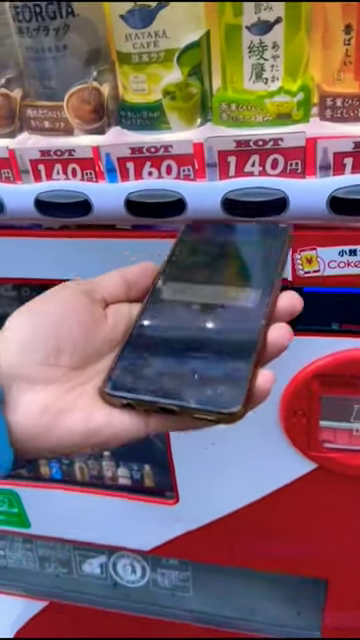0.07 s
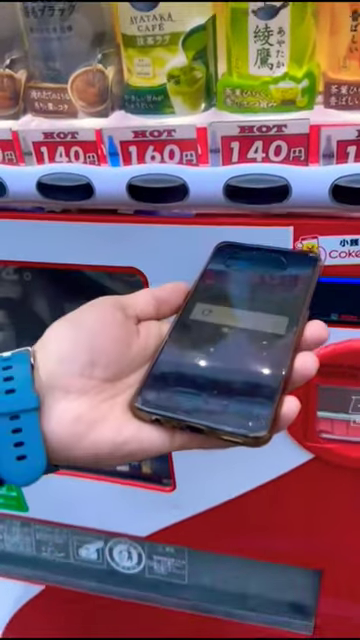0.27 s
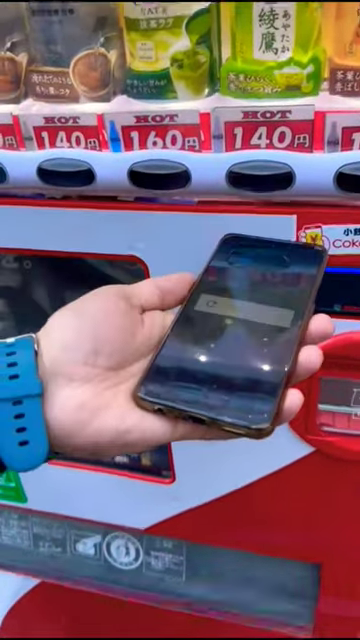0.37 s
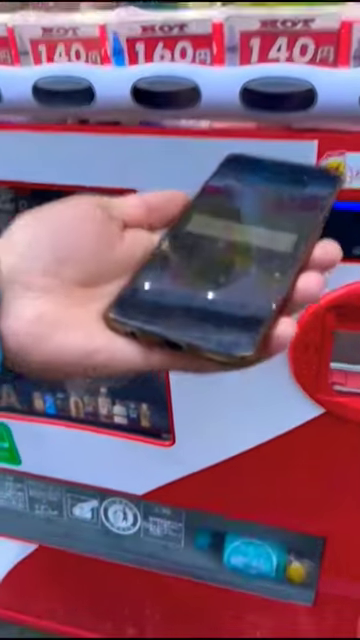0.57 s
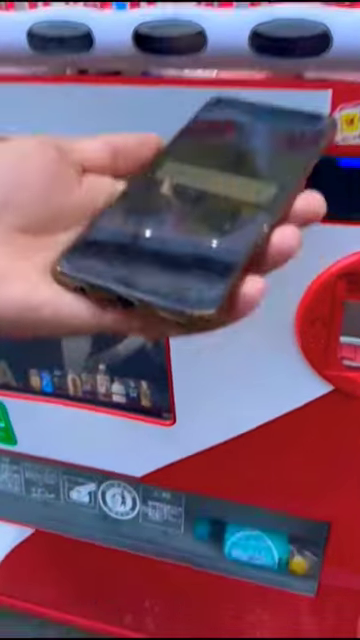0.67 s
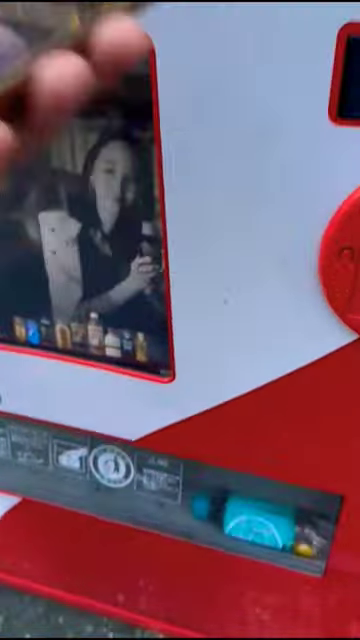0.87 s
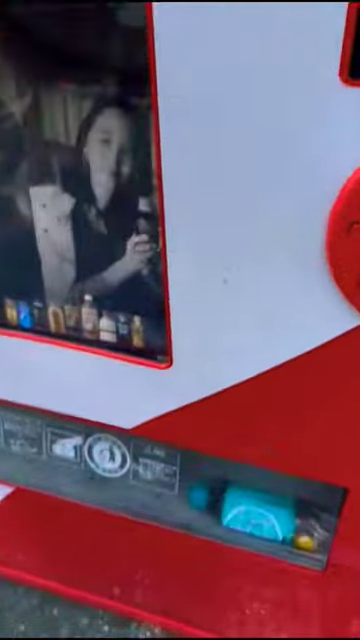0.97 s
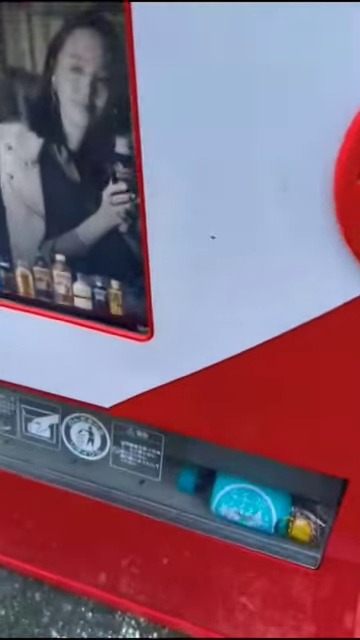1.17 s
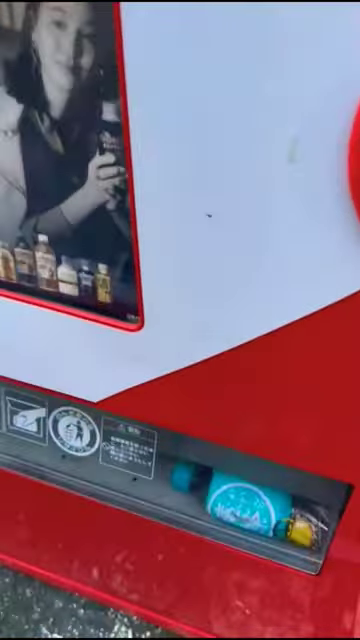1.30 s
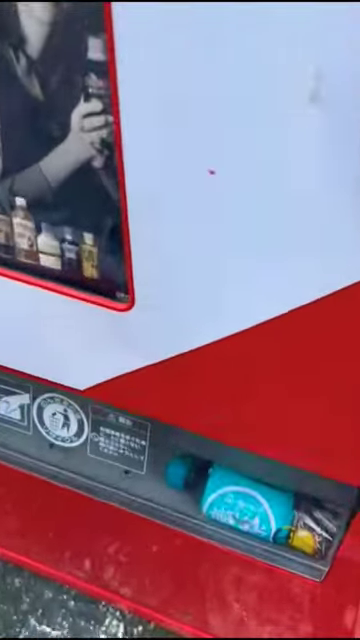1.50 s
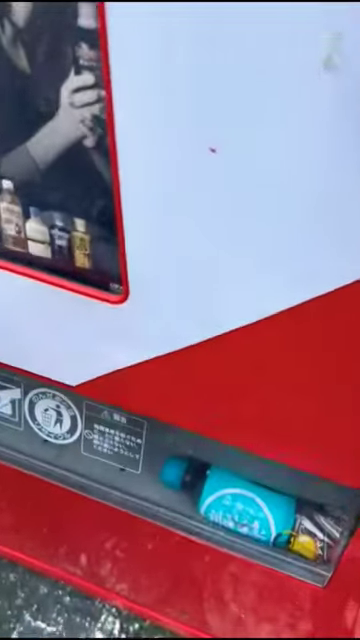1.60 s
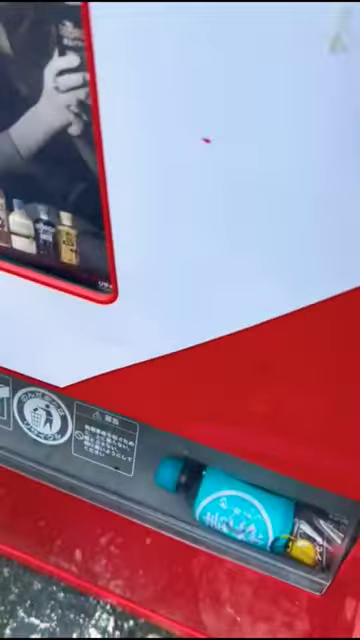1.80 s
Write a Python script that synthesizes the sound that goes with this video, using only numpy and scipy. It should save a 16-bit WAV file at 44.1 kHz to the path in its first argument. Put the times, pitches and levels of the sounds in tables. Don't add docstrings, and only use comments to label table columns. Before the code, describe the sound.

Vending machine drink bottle slides, bangs into the metal chute, then rattles to rest outdoors

```python
import sys
import numpy as np
from scipy import signal
from scipy.fft import rfft, irfft, next_fast_len
from scipy.io import wavfile
from scipy.ndimage import uniform_filter1d

SR = 44100
rng = np.random.default_rng(int(sys.argv[2]) if len(sys.argv) > 2 else 0)


def transcribe(u):
    v = np.clip(np.atleast_2d(u).T, -1, 1)
    q = np.round(v * 32767).astype(np.int16)
    wavfile.write(sys.argv[1], SR, q)


def elevation(decibels):
    levels = np.asarray(decibels, float)
    return 10 ** (levels / 20)


N = 81585
SIZE = next_fast_len(N + SR // 2)
HZ = np.arange(SIZE // 2 + 1) * SR / SIZE + 1e-3
T = np.arange(N) / SR

# [f/Hz, level/dB per Hz]
STREET_COLOUR = [(28, -19), (55, 0), (97, -7), (140, -7.5), (300, -14.5), (800, -17), (1500, -34),
                 (3000, -44), (6500, -51.5), (10500, -55), (12000, -76.5)]
# [f/Hz, level/dB]
STREET_APART = [(40, -8.5), (300, -4), (800, -8), (1600, 0.5), (3000, -0.5), (4000, 1), (4800, -1.5),
                (5500, -50.5), (7900, -44), (9200, -2), (10400, -22)]
STREET_DB, SWELL_DB, FLICKER_DB = -32, 0, 1.5
HUM_HZ, HUM_WIDTH_HZ, HUM_DB = 97.4, 28.8, -31.5

# [t/s, level/dB]
EFFORT = [(0, -48), (.10, -43), (.16, -51.5), (.185, -35), (.28, -35.5), (.31, -54), (.36, -44), (.41, -33),
          (.44, -22.5), (.56, -25), (.61, -30), (.72, -30), (.82, -30), (.86, -46), (1.0, -48.5),
          (1.15, -54.5), (1.3, -57)]
GRAINS_PER_S, GRAIN_SPREAD_DB = 2500, -0.5
RUMBLE_DB, RATTLE_DB, RING_DB = 5.5, 1.5, -30
# [t/s, level/dB, contact/ms]
THUDS = [(.104, -24, 2.3), (0.185, -24, 0.73), (0.202, -17, 2.8), (0.223, -12, 4), (0.254, -23, 2.8),
         (0.286, -21, 2.9), (0.427, -5, 2.45), (0.437, 4.5, 9.9), (0.448, -9, 0.84), (0.456, -18, 0.67),
         (0.459, -6.5, 6.8), (0.513, -30.5, 4.1), (0.544, -32, 1.7), (.559, -20.5, 0.63),
         (.590, -22.5, 0.45), (0.636, -30, 3.3), (.665, -17, 3), (0.672, -19.5, 1.6), (0.71, -24, 0.77),
         (0.718, -15.5, 1.3), (0.764, -25.5, 1.4), (0.82, -23.5, 0.78), (0.83, -19, 1), (0.896, -28.5, 4.6)]
KNOCK_SPREAD_DB, KNOCK_DETUNE = 3, .04
# [t/s, level/dB, decay/ms, tilt/dB per octave]
CRACKS = [(0.174, -32, 110, -6), (0.197, -27, 98, -3.5), (0.252, -32, 250, -6.5), (0.423, -19, 29, -1.5),
          (0.434, -21.5, 17, 8.5), (0.4472, -10.5, 13, 6.5), (0.451, -14.5, 47, 1.5), (0.507, -19, 110, 2),
          (.522, -19.5, 33, 3), (.532, -18.5, 14, 15), (0.539, -8, 17, 1.5), (0.55, -15.5, 11, 2.5),
          (0.555, -17, 41, -2), (0.631, -23, 31, 1.5), (0.642, -27, 52, 4), (0.674, -27.5, 37, 4),
          (0.705, -14.5, 30.6, 2), (0.736, -29, 41, 2), (0.778, -32, 26, 7), (0.794, -26.5, 49, 3.5),
          (0.805, -26.5, 40, 0)]
CRACK_RISE_S, CRACK_GRAIN_DB = 0.0007, 3.3
# [t/s, click level/dB, f/Hz, decay/ms, ring over click/dB]
TICKS = [
    (0.64, -30.5, 3600, 42, -2),
    (0.811, -33, 2240, 35, -5.5),
    (0.939, -39, 5780, 23, -24),
    (0.979, -38, 2320, 12, -15),
    (1.055, -56.5, 5100, 25, 11),
    (1.277, -45.5, 3530, 37, -8),
    (1.436, -46.5, 3440, 25, -7),
    (1.659, -38, 2300, 27, -8),
    (1.687, -46, 2350, 30, -9.5),
    (1.828, -41, 8160, 18, -18),
]
TICK_TILT_DB = 1.5

# [f/Hz, level/dB, t60/s]
CABINET = [(60.8, -15, 0.36), (90.4, -15, 0.22), (138.8, -11, 0.061), (167.5, -9.5, 0.2),
           (213.7, -0.5, 0.16), (252.2, -5, 0.14), (311.6, -5.5, 0.078), (364, 4, 0.05), (473.8, -6, 0.18),
           (592.7, -7.5, 0.17), (628, -14, 0.068), (823, -15.5, 0.1), (942, -8, .1), (1061, -10.5, 0.13)]
# [f/Hz, level/dB, t60/s]
CHUTE = [(1070, -2, .025), (1560, -1, .03), (1700, -3, .03), (2120, -1, .035), (2520, -3, .03),
         (3300, -6, .015), (5900, -4, .015), (6800, -4, .015)]
# [f/Hz, level/dB per Hz]
PLASTIC = [(250, -24.5), (450, 2.5), (1000, -3.5), (2300, -14), (3500, -19.5), (6300, -18), (9300, -24),
           (10300, -21), (11800, -38)]

# [f/Hz, level/dB]
NEAR_APART = [(30, -28), (350, -35.5), (800, -0.5), (1800, -18), (2800, -1), (4000, 1), (4500, -7.5),
              (5400, -39), (7900, -41), (9000, 0.5), (10400, -9.5)]
SCATTER_T60_S = 0.053
# [f/Hz, lag/cycles]
NEAR_LAG = [(0, 0), (520, .15), (720, .27), (1030, .87), (1550, 1)]
# [f/Hz, lag/cycles]
STREET_LAG = [(0, .1), (260, .43), (700, .5), (1300, .56), (1900, .97)]
# [f/Hz, lag/cycles]
PORT_LAG = [(2250, 1.04), (2700, 1.5), (3050, 1.55), (3900, 2), (4150, 2.02), (4600, 2.5), (5000, 2.6),
            (5350, 3), (7800, 3), (10200, 3.5)]
# [f/Hz, left minus right/dB]
NEAR_SHADE = [(170, 0), (350, -2.5), (780, -14), (1150, -7), (1700, 0), (2600, 5), (3450, -2), (4500, 3),
              (5400, 0)]
# [f/Hz, left minus right/dB]
STREET_SHADE = [(170, .5), (550, -3), (1500, -1), (3000, 0)]

LOW_CUT_HZ, TOP_HZ, CEILING = 63, 11800, 1.7
PATCHY_S, PATCHY_LENGTH_S, PATCH_BAND_HZ = 1.52, .2, 90
DROP_DB, DROPS_PER_S = -40, 18
# [from f/Hz, to f/Hz, readiness]
MID_DROPS = [(4600, 4800, 0), (4800, 5000, .9), (5000, 5150, -.1), (4000, 4300, -1.6), (3050, 3350, -1.5),
             (2700, 2850, -1.7), (9300, 9650, -.7), (9650, 10000, .2)]
# [from f/Hz, to f/Hz, readiness]
SIDE_DROPS = [(3850, 4150, .2), (4150, 4400, -.8), (1750, 2000, -.5), (11300, 11700, 0), (11700, 12200, .9)]
# [t/s, length/s, up to f/Hz, level/dB]
TOP_OPEN = [
    (0.168, .04, 10800, -2.5),
    (0.366, .07, 10800, -1),
    (0.436, .03, 11800, -9),
    (0.496, .075, 10940, -5.5),
    (0.604, .03, 11230, -7),
    (.79, 0.027, 10800, -18),
    (.815, .012, 11800, -7),
]
# [t/s, length/s]
SIDE_OPEN = [
    (.395, .07),
    (.603, .025),
    (.693, .052),
    (.812, .025),
]
SIDE_OPEN_DB, SHARED_TOP_HZ = -14, 10160


def level(x, db):
    return x * elevation(db) / np.sqrt(np.mean(x ** 2))


def curve(points):
    hz, db = np.array(points, float).T
    return elevation(np.interp(np.log(HZ), np.log(hz), db))


def shape(x, gain):
    return irfft(rfft(x, SIZE) * gain, SIZE)[..., :N]


def between(lo_hz, hi_hz):
    return (HZ >= lo_hz) & (HZ < hi_hz)


def resonance(hz, width_hz):
    return 1 / (1 + ((HZ - hz) / (width_hz / 2)) ** 2)


def tilt(db_per_octave, floor):
    return elevation(db_per_octave * np.log2(HZ / 3000 + floor))


def ring(x, modes):
    out = 0
    for hz, db, t60 in modes:
        pole = np.exp(2j * np.pi * hz / SR - np.log(1000) / (t60 * SR))
        out = out + elevation(db) * signal.lfilter([1], [1, -pole], x).imag
    return out


def walk(rate):
    k = int(SR / rate)
    held = np.repeat(rng.standard_normal(N // k + 1), k)
    return 1.1 * uniform_filter1d(uniform_filter1d(held, k), k)[:N]


def burst(start, decay_ms, rise_s):
    t = np.maximum(T - start, 0)
    return (1 - np.exp(-t / rise_s)) * elevation(-20 * t / (decay_ms / 1000))


def gate(start, length):
    return np.clip(np.minimum(T - start, start + length - T) / .005, 0, 1)


def traffic():
    out, swell = 0, SWELL_DB * walk(9.4)
    colour, apart = curve(STREET_COLOUR), curve(STREET_APART)
    for hz in 30 * 2 ** np.arange(0, 9, 1 / 3):
        band = colour * np.exp(-.5 * (np.log2(HZ / hz) / .17) ** 2)
        mid, side = rng.standard_normal((2, N))
        mid, side = shape(mid, band), shape(side, band * apart)
        out = out + elevation(swell + FLICKER_DB * walk(8.78)) * np.array([mid + side, mid - side])
    return level(out, STREET_DB)


def compressor():
    mid, side = shape(rng.standard_normal((2, N)), resonance(HUM_HZ, HUM_WIDTH_HZ))
    return level(mid, HUM_DB) + level(side, HUM_DB - 6) * np.array([[1], [-1]])


def tumble():
    chance, sign, size = rng.random((N, 3)).T
    contacts = (chance < GRAINS_PER_S / SR) * np.sign(sign - .5)
    grains = contacts * elevation(-GRAIN_SPREAD_DB * np.log(size + 1e-9))
    grains = grains * elevation(3.46 * walk(60.37))
    rattle = level(shape(grains, curve(PLASTIC)), RATTLE_DB)
    chute = level(ring(grains, CHUTE), RING_DB)
    rumble = level(ring(grains, CABINET), RUMBLE_DB)
    return elevation(np.interp(T, *np.array(EFFORT).T)) * (rattle + chute + rumble)


def thuds():
    out = np.zeros(N)
    for s, db, ms in THUDS:
        part = slice(int((s - .02) * SR), int((s + .4) * SR))
        push = elevation(db) / ms * np.exp(-.5 * ((T[part] - s) / (ms / 4000)) ** 2)
        spot = rng.standard_normal((len(CABINET), 2))
        modes = [(hz * (1 + KNOCK_DETUNE * a), g + KNOCK_SPREAD_DB * b, t60)
                 for (hz, g, t60), (a, b) in zip(CABINET, spot)]
        out[part] += ring(push, modes)
    return 0.029 * out


def cracks():
    colour, out = curve(PLASTIC), 0
    for s, db, ms, tilt_db in CRACKS:
        grainy = rng.standard_normal(N) * elevation(CRACK_GRAIN_DB * walk(450))
        noise = shape(grainy, colour * tilt(tilt_db, 0.15))
        out = out + level(noise, db) * burst(s, ms, CRACK_RISE_S)
    return out + 0.0068 * elevation(RING_DB) * ring(out, CHUTE)


def ticks():
    colour, out = curve(PLASTIC) * tilt(TICK_TILT_DB, 0.27), 0
    for s, db, hz, ms, tone_db in TICKS:
        tone = shape(rng.standard_normal(N), resonance(hz, 0.1 * hz))
        click = shape(rng.standard_normal(N), colour)
        out = out + level(tone, db + tone_db) * burst(s, ms, .0004)
        out = out + level(click, db) * burst(s, 0.76 * ms, 0.00038)
    return out


def scatter(near):
    lag = np.arange(4096) / SR
    paths = level(rng.standard_normal(4096) * elevation(-60 * lag / SCATTER_T60_S), -36)
    side = shape(near, rfft(paths, SIZE) * curve(NEAR_APART))
    return np.array([near + side, near - side])


def ports(pair, lag, shade):
    shifted = np.exp(-2j * np.pi * np.interp(HZ, *np.array(lag + PORT_LAG).T))
    return np.array([shape(pair[0], shifted * curve(shade)), pair[1]])


def scene():
    near = thuds() + cracks() + ticks() + tumble()
    near = ports(scatter(near), NEAR_LAG, NEAR_SHADE)
    return near + ports(traffic() + compressor(), STREET_LAG, STREET_SHADE)


def drop(x, bands):
    spectrum = rfft(x, SIZE)
    for lo_hz, hi_hz, ready in bands:
        muted = np.clip(4 * (1.4 * walk(DROPS_PER_S) + ready), 0, 1)
        band = irfft(spectrum * between(lo_hz, hi_hz), SIZE)[:N]
        x = x - (1 - elevation(DROP_DB * muted)) * band
    return x


def low_patches():
    patchy = np.exp(-.5 * ((T - PATCHY_S) / PATCHY_LENGTH_S) ** 2)
    return [(hz, hz + PATCH_BAND_HZ, 3 * patchy - 2.9 - abs(hz - 600) / 900)
            for hz in np.arange(170, 1400, PATCH_BAND_HZ)]


def low_pass(x):
    return signal.sosfilt(signal.butter(12, 12130, fs=SR, output="sos"), x)


def record(dry):
    s = 1j * HZ / LOW_CUT_HZ
    x = shape(dry, s * s / (s * s + 1.17 * s + 1))
    x = shape(CEILING * np.tanh(x / CEILING), 1 / (1 + (HZ / TOP_HZ) ** 60))
    mid, side = (x[0] + x[1]) / 2, (x[0] - x[1]) / 2
    mid = drop(mid, MID_DROPS + low_patches())
    side = drop(side, SIDE_DROPS)
    top = 0
    for start, length, hz, db in TOP_OPEN:
        top = top + elevation(db) * gate(start, length) * shape(side, between(SHARED_TOP_HZ, hz))
    shifted = shape(mid, between(5300, 8200) * np.exp(1j * HZ / 300))
    side = side + elevation(SIDE_OPEN_DB) * shifted * sum(gate(*span) for span in SIDE_OPEN)
    mid = shape(mid, between(0, SHARED_TOP_HZ)) + top
    mix = np.clip([mid + side, mid - side], -.95, .95)
    return low_pass(mix)


dry = scene()
out = record(dry)
transcribe(out)
```